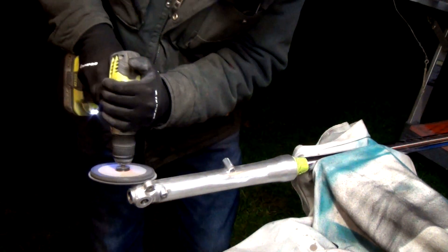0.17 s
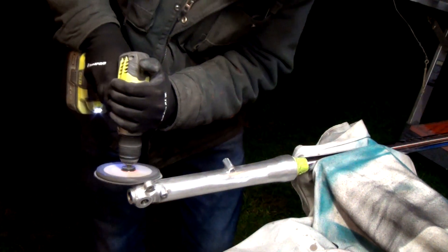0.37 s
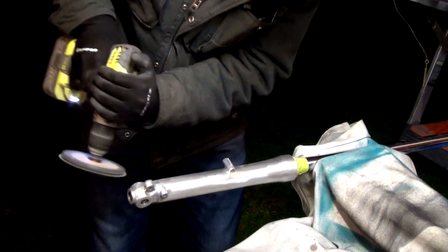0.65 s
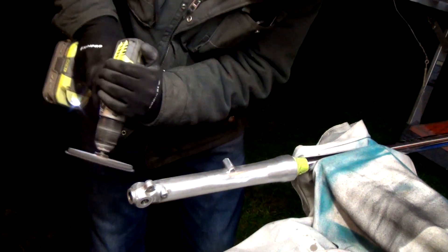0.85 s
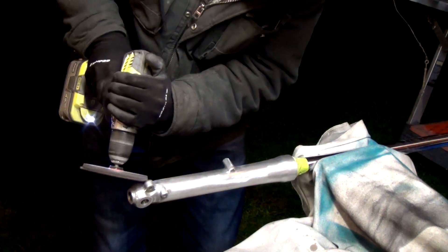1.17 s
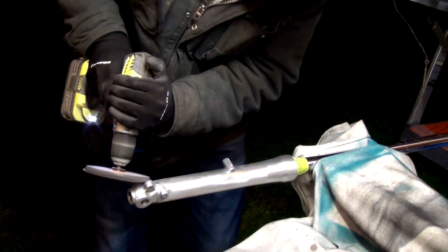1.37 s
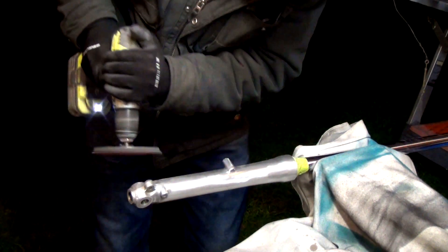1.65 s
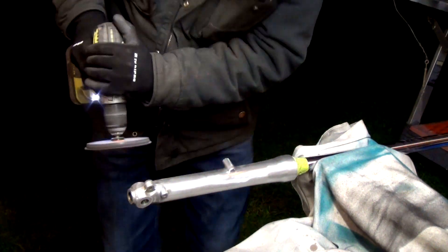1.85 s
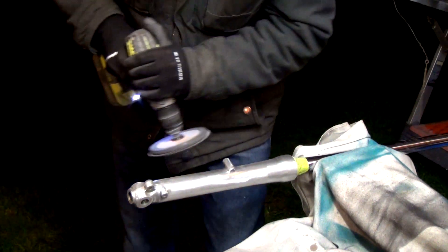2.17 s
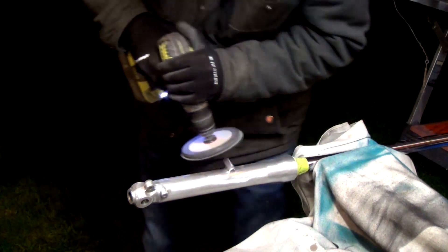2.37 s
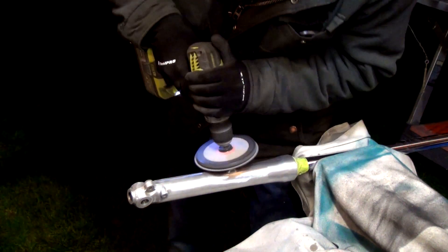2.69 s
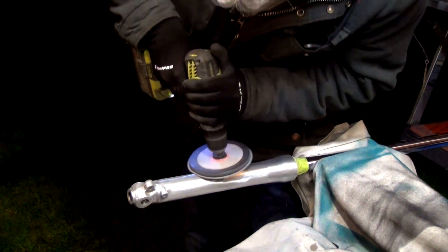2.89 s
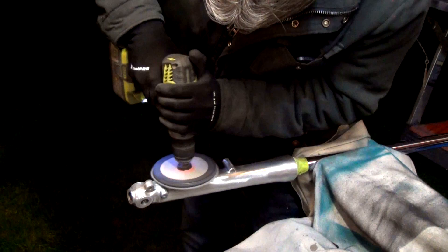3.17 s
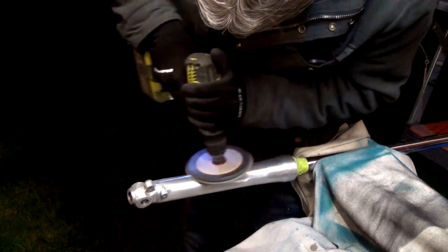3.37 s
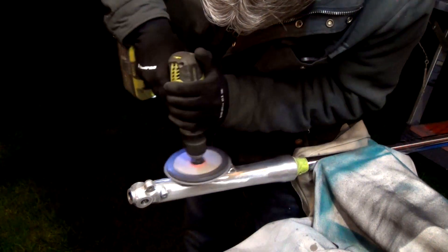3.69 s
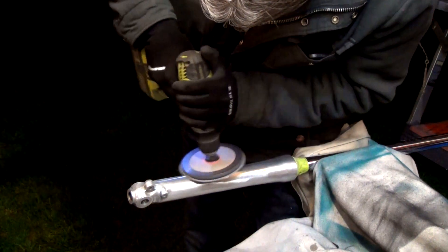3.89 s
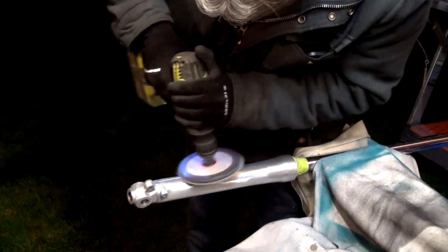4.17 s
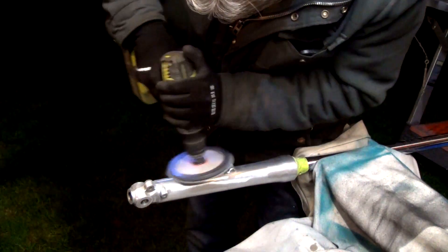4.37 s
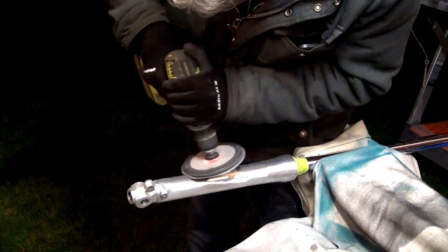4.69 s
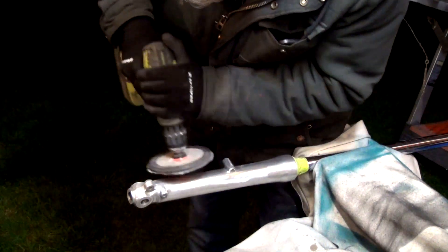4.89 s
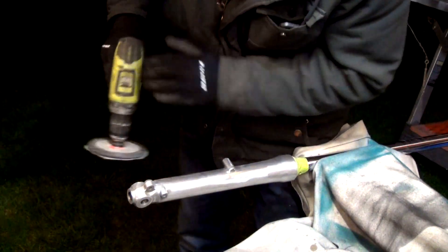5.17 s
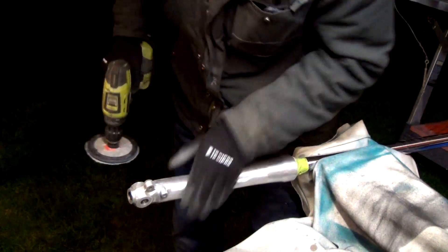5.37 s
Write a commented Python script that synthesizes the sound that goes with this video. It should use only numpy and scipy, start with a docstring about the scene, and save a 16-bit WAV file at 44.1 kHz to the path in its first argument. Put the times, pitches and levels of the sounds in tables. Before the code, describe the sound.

A cordless drill is already running close by outdoors, a steady shrill whine around 3.5 kHz with thinner overtones, gear clatter and airy fan hiss. At 0.2-0.7 s its sanding disc touches an aluminium tube: a bright gritty rasp with hollow ring, pitch sagging, and a brief squeal near 0.4 s. A second, shorter touch comes at 1.25-1.55 s. The drill then runs free, its whine swelling and fading as it moves, with faint low thuds at 1.9 and 2.35 s. From 2.9 s a longer sanding pass rasps and booms; the motor bogs deeply around 3.5 s, recovers, and grinds on. About 4.4 s the trigger is released; whine and rasp slide down to a stop by 4.85 s. Tiny metallic ticks follow at 4.93-5 s, clothing rustles, a faint low hum passes, and at 5.45 s a glove lands softly and wipes along the tube over quiet hush and distant rumble.

```python
"""Drill with a sanding disc on a metal tube

A cordless drill in the open: its motor whines on multiples of the shaft speed over filtered noise for gears and fan.
The disc touches an aluminium tube: noise in grit, wall and boom bands rasps and booms as the shaft slows.
The trigger is let go, the spindle ticks to rest as decaying modes, and a glove wipes along the tube.
Rumble, hush and rustle lie beneath; squeal, hum and soft thuds are short sines."""
import sys
import numpy as np
from scipy import signal
from scipy.fft import rfft, irfft, next_fast_len
from scipy.io import wavfile
from scipy.ndimage import uniform_filter1d, map_coordinates

SR = 44100
rng = np.random.default_rng(int(sys.argv[2]) if len(sys.argv) > 2 else 0)


def transcribe(signal):
    """Save signal, clipped to [-1, 1], as a 16-bit WAV file at the path in sys.argv[1]."""
    frames = np.atleast_2d(signal).T
    limited = np.clip(frames, -1, 1)
    pcm = np.round(limited * 32767).astype(np.int16)
    wavfile.write(sys.argv[1], SR, pcm)


N = 244308

FREE_HZ = 293.4  # shaft speed running free
# what reaches the microphone as the housing turns, before load, slowing and wobble:
# [t/s, whine/dB, shaft hum/dB, high whine/dB, fan over gears/dB]
HOUSING_LEVELS = [(0, -27.5, -59, -39, 0), (.22, -34, -57.5, -43.5, -1.5), (.4, -36, -58, -45, 1),
                  (.47, -37, -59, -41, 3), (.505, -48, -59, -45, 2), (.54, -38, -62, -37, 1),
                  (.72, -29, -53.5, -41, 0), (1.12, -34.5, -56, -51, -0.5), (1.32, -33.5, -60, -47, 3.5),
                  (1.57, -32.5, -57, -42, 1), (1.7, -42.5, -54.5, -54, -0.5), (1.9, -31.5, -48, -56, -0.5),
                  (2.08, -32, -50, -59, -2), (2.26, -40, -48, -42, 0), (2.67, -27, -51.5, -44, 0.5),
                  (2.92, -27, -52.5, -41, 0), (3.26, -31.5, -56, -56, -3.5), (3.36, -34.5, -56, -52, -3),
                  (3.43, -26.5, -56, -50, -6), (3.505, -39, -60, -50, -9), (3.54, -31, -54, -51, -7),
                  (3.68, -30, -55.5, -50, 1), (3.9, -30, -54.5, -54, -4.5), (4.22, -38, -60, -54, -6),
                  (4.37, -31.5, -60, -50, 0), (4.43, -32, -54, -50, -2)]


def amp(db):
    """Amplitude factor of a level in dB."""
    return 10 ** (np.asarray(db) / 20)


def unit(x):
    """x scaled to rms 1."""
    return x / np.sqrt(np.mean(x ** 2) + 1e-20)


def along(points, hz):
    """Interpolate (Hz, value) points on a log frequency axis."""
    f, v = np.transpose(points)
    return np.interp(np.log(hz + 1), np.log(f + 1), v)


def curves(rows):
    """One value per sample for each column after the time."""
    s, *cols = np.transpose(rows)
    return [np.interp(np.arange(N) / SR, s, c) for c in cols]


def window(t0_s, t1_s, fade_s):
    """1 between two times, with linear fades inside them."""
    t = np.arange(N) / SR
    return np.clip(np.minimum(t - t0_s, t1_s - t) / fade_s, 0, 1)


def wobble(rate_hz):
    """Random curve, straight between rate_hz knots a second."""
    knots = rng.standard_normal(int(N * rate_hz / SR) + 4)
    return map_coordinates(knots, [np.arange(N) * rate_hz / SR], order=1)


def filtered(x, response):
    """x times a complex response of frequency."""
    m = next_fast_len(N + 8192)
    return irfft(rfft(x, m) * response(np.fft.rfftfreq(m, 1 / SR)), m)[..., :N]


def resonances(modes):
    """Response of (Hz, width Hz, dB) modes summed with alternating sign."""
    def response(f):
        total = 0
        for k, (centre, width, db) in enumerate(modes):
            damping = 1j * f * width
            total = total + (-1) ** k * amp(db) * damping / (centre ** 2 - f ** 2 + damping)
        return total
    return response


def colour(points):
    """Response of a (Hz, dB) spectrum."""
    return lambda hz: amp(along(points, hz))


def noise(response, patchy_db, grainy_db=0.):
    """Noise of rms 1 with time-frequency patches of random gain and grains of uneven size."""
    grains = rng.standard_normal(N) * amp(grainy_db * wobble(2500))
    z = signal.stft(grains, nperseg=512)[2]
    field = uniform_filter1d(rng.standard_normal(z.shape), 6, 0)
    field = uniform_filter1d(field, 8, 1)
    patched = signal.istft(z * amp(patchy_db * unit(field)), nperseg=512)[1][:N]
    return unit(filtered(patched, response))


def shaft():
    """Shaft turns, halvings of speed below free running, and load (0-1) taken from the speed sag."""
    # shaft speed; after the last point it coasts evenly to a stop: [t/s, f/Hz]
    speed = [(0, 294), (.25, 293.8), (.39, 278.8), (.48, 276.7), (.54, 272), (.63, 290.5), (.72, 293),
             (1.3, 293.3), (1.42, 281.4), (1.5, 290), (1.62, 292.8), (2.96, 293.4), (3.06, 288.3),
             (3.27, 285.4), (3.4, 222.7), (3.5, 205.8), (3.58, 262.2), (3.67, 285.6), (3.8, 293),
             (3.97, 283.4), (4.22, 278.3), (4.3, 282.5), (4.375, 274.3), (4.43, 239.7), (4.53, 162)]
    stop_s = 4.825
    coast = np.clip((stop_s - np.arange(N) / SR) / (stop_s - speed[-1][0]), 1e-6, 1)
    hz = curves(speed)[0] * coast
    load = np.clip((FREE_HZ - hz) / 8, 0, 1)
    unsteady = 1 + (0.00059 + 0.002 * load + .004 * (1 - coast)) * wobble(80)
    return np.cumsum(hz * unsteady) / SR, np.log2(FREE_HZ / hz), load


def whine(turns, halvings, load):
    """Shaft-speed multiples swell as the housing turns; load adds flutter and weakens the upper ones."""
    # multiples with their own load loss and flutter, free running: [multiple/1, level/dB]
    middle_orders = [(3, -63), (5, -50.5), (20, -47)]
    # weak multiples, free running: [multiple/1, level/dB]
    weak_orders = [(2, -62), (4, -57), (10, -51), (14, -58), (15, -54), (17, -64), (18, -60), (21, -60),
                   (22, -54), (23, -59), (24, -54), (25, -49), (26, -52), (27, -51), (28, -56), (29, -55),
                   (30, -53), (32, -57), (33, -58), (34, -56), (35, -52), (36, -61), (37, -65), (38, -66),
                   (39, -64), (40, -58), (41, -67), (42, -67), (45, -67), (49, -64), (50, -62), (51, -64),
                   (52, -67)]
    whine_order, high_order = 12, 31
    case_hz, case_width_hz, case_db = 1010, 45, -34
    db_per_halving = 21

    def tone(order):
        return np.sqrt(2) * np.sin(2 * np.pi * (order * turns + rng.random()))

    def flutter_db():
        return (1.2 + 2.6 * load + 4 * np.minimum(halvings, 1)) * wobble(70)

    whine_db, hum_db, high_db, _ = curves(HOUSING_LEVELS)
    total = amp(whine_db + 1.23 * wobble(7.9) + flutter_db()) * tone(whine_order)
    total += amp(hum_db + flutter_db()) * tone(1)
    total += amp(high_db - 13 * load + 3 * wobble(9) + flutter_db()) * tone(high_order)
    for order, db in middle_orders:
        load_loss_db = 18 if order > whine_order else 6
        level_db = db - load * load_loss_db + 4.24 * wobble(9) + flutter_db()
        total += amp(level_db) * tone(round(order))
    # the casing rings when the fifth multiple sinks through its resonance
    fifth_hz = FREE_HZ * 5 / 2 ** halvings
    total += amp(case_db + flutter_db()) / (1 + ((fifth_hz - case_hz) / case_width_hz) ** 2) * tone(5)
    for order, db in weak_orders:
        total += amp(db - 20 * load + 4 * wobble(8)) * tone(order)
    return total * amp(-db_per_halving * halvings)


def rush(turns, halvings):
    """Gear clatter and fan hiss, falling as the shaft slows; the fan beats once and twice per turn."""
    # gear noise spectrum: [f/Hz, relative density/dB]
    gear_spectrum = [(35, -65), (60, -44), (236, -24.5), (289, -13.5), (427, -20), (513, -14.5), (653, -16),
                     (1370, -7), (1450, -6.5), (1680, -6), (2210, -3.5), (3270, -5.5), (3450, -7.5),
                     (3720, -5), (5000, -25.5), (6500, -50.5), (11000, -120)]
    # fan noise spectrum: [f/Hz, relative density/dB]
    fan_spectrum = [(2650, -23), (4500, -3.5), (5040, -11), (5590, -4.5), (5680, -0.5), (6740, -1),
                    (7400, 2), (8130, -2), (10100, -3), (12600, -14), (15500, -13.5)]
    gears_db, db_per_halving = -37, 4.5
    beat = 1 + 0.052 * np.cos(2 * np.pi * turns) + 0.059 * np.cos(4 * np.pi * turns)
    gears = noise(colour(gear_spectrum), patchy_db=1.0)
    fan = noise(colour(fan_spectrum), patchy_db=1.0, grainy_db=1.0)
    fan = amp(curves(HOUSING_LEVELS)[3]) * beat * fan
    return amp(gears_db - db_per_halving * halvings + 0.62 * wobble(7)) * (gears + fan)


def air():
    """Distant rumble, the hush of the surroundings and clothes that stir more once the work is done."""
    # distant rumble spectrum: [f/Hz, relative density/dB]
    rumble_spectrum = [(12, -40), (30, -14), (48, -1), (70, -3), (110, -6), (200, -44)]
    # hush spectrum: [f/Hz, relative density/dB]
    hush_spectrum = [(12, -49), (20, -34), (161, -9.5), (189, -6), (324, -12), (404, -8), (437, -14),
                     (602, -15), (640, -15.5), (1370, -17), (2400, -31), (3120, -49), (5280, -120)]
    # rustle spectrum: [f/Hz, relative density/dB]
    rustle_spectrum = [(1060, -23), (1800, -3), (2400, -5), (2780, -6), (3210, -5), (3980, -7), (4990, -15),
                       (5920, -9.5), (9050, -11), (15500, -22)]
    rumble_db, hush_db, rustle_db, rustle_s = -77.5, -62, -66, 4.95
    rumble = noise(colour(rumble_spectrum), patchy_db=0.0)
    hush = noise(colour(hush_spectrum), patchy_db=1.2)
    stir_db = -5.5 + 5.6 * window(rustle_s - .04, 9, .05)
    stir_db += 4 * window(rustle_s - .02, rustle_s + .06, .02) + 1.2 * wobble(12)
    rustle = amp(stir_db) * noise(colour(rustle_spectrum), patchy_db=1.8, grainy_db=1.0)
    return amp(rumble_db) * rumble + amp(hush_db) * hush + amp(rustle_db) * rustle


def contact_noises(turns):
    """Grit, fine grit, tube wall and boom noises; the warped disc bears unevenly once and twice a turn."""
    # grit spectrum: [f/Hz, relative density/dB]
    grit_spectrum = [(3800, -23.5), (5000, -1), (5700, 0.5), (6700, -0.5), (8900, 1.5), (9400, -0.5),
                     (10000, -8), (11000, -16.5), (14300, -33), (22000, -120)]
    # fine grit spectrum: [f/Hz, relative density/dB]
    fine_spectrum = [(6470, -35), (11000, -1), (13300, -2.5), (14700, -3), (15500, -5)]
    # tube wall modes: [f/Hz, width/Hz, relative level/dB]
    wall_modes = [(513, 14, -5.5), (1008, 34, -1), (1170, 64, -5.5), (1420, 146, 0), (1894, 260, -0.5),
                  (2210, 230, 0), (2684, 210, 3), (3106, 180, 5.5), (3310, 780, 2), (4440, 610, 0.5)]
    # tube on its rest, response before squaring: [f/Hz, width/Hz, relative level/dB]
    boom_modes = [(126, 62, -8), (169, 34, 1.5), (198.7, 38, 0)]
    disc = turns / 14.5  # gear reduction
    bearing_db = 0.69 * np.cos(4 * np.pi * disc) + 0.57 * np.cos(2 * np.pi * disc)
    bearing = amp(bearing_db + 0.19 * wobble(40))
    grit = bearing * noise(colour(grit_spectrum), patchy_db=2.0, grainy_db=1.5)
    fine = noise(colour(fine_spectrum), patchy_db=2.0, grainy_db=1.5)
    fine = bearing * amp(1.5 * wobble(14)) * fine
    wall = bearing * noise(resonances(wall_modes), patchy_db=1.0, grainy_db=3.0)
    boom = noise(lambda f: resonances(boom_modes)(f) ** 2, patchy_db=1.)
    return grit, fine, wall, boom


def sanding(contact, halvings):
    """Disc pressure drives grit, wall ring and tube boom; a slower disc rings the wall less."""
    # pressure of the disc, one list per touch: [t/s, grit/dB, boom/dB]
    touches = [
        [(.2, -45, -75), (.29, -33, -52), (.37, -32.5, -61), (.42, -32, -50), (.56, -31.5, -56),
         (.62, -39.5, -53), (.7, -47, -70)],
        [(1.2, -52, -75), (1.28, -37.5, -65), (1.36, -31, -51), (1.43, -32, -56), (1.5, -36.5, -51),
         (1.546, -35, -54), (1.57, -56, -57), (1.7, -59, -68)],
        [(2.9, -41, -72), (3.01, -34.5, -63), (3.14, -34, -61), (3.3, -33, -58), (3.38, -36.5, -57),
         (3.5, -36.5, -58), (3.55, -33.5, -54), (3.73, -37, -56), (3.81, -40, -78), (3.86, -34, -52.5),
         (4.06, -33.5, -53.5), (4.37, -33, -52), (4.55, -39.5, -60), (4.72, -54.5, -57), (4.79, -52, -60),
         (4.865, -56, -66), (4.885, -68, -82)],
    ]
    # balance of each touch at full pressure: [fine grit over grit/dB, wall ring over grit/dB]
    tints = [(-10, -1), (-7, -2.5), (-9.5, -0.5)]
    full_db, fine_follows, wall_follows = -34, 0.56, 1.05  # follows: dB per dB of grit
    wall_db_per_halving = 2.2
    grit, fine, wall, boom = contact
    out = np.zeros(N)
    for rows, (fine_db, wall_db) in zip(touches, tints):
        grit_db, boom_db = curves(rows)
        swing_db = grit_db - full_db
        slowing_db = wall_db_per_halving * np.minimum(halvings, 4)
        rasp = amp(swing_db) * grit
        rasp += amp(fine_db + fine_follows * swing_db) * fine
        rasp += amp(wall_db + wall_follows * swing_db - slowing_db) * wall
        gate = window(rows[0][0], rows[-1][0] + 0.025, 0.024)
        out += gate * (amp(full_db) * rasp + amp(boom_db) * boom)
    return out


def glove_wipe(contact):
    """The glove lands with a decaying scuff of the wall, then slides on with grit and boom noise."""
    wipe_s, scuff_db, scuff_t60_s = 5.447, -52.5, 0.17
    slide_db, boom_db = -58, -56.5
    grit, fine, wall, boom = contact
    since_s = np.maximum(np.arange(N) / SR - wipe_s - .012, 0)
    scuff = window(wipe_s, 9, 0.0056) * amp(scuff_db - 60 * since_s / scuff_t60_s) * wall
    slide = amp(slide_db) * grit + amp(slide_db - 3) * fine + amp(boom_db) * boom
    return scuff + window(wipe_s + 0.0046, 9, 0.018) * slide


def brief_tones():
    """Gliding sines with random level: a squeal of the tube and a low hum."""
    # squeal, hum: [t/s, length/s, from f/Hz, to f/Hz, rms level/dB]
    tones = [(.41, 0.093, 3150, 3090, -36), (5.04, .085, 222, 248, -61)]
    out = np.zeros(N)
    for s, length_s, from_hz, to_hz, db in tones:
        hz, = curves([(s, from_hz), (s + length_s, to_hz)])
        sine = np.sqrt(2) * np.sin(2 * np.pi * np.cumsum(hz) / SR)
        out += amp(db + 1.2 * wobble(49)) * sine * window(s, s + length_s, 0.031)
    return out


def soft_thuds():
    """Low sines with a soft onset and exponential decay."""
    # thuds, level before the onset curve: [t/s, level/dB, f/Hz]
    thuds = [(1.919, -53, 109.3), (2.349, -44, 110.1), (5.477, -40, 163)]
    out, t = np.zeros(N + SR), np.arange(SR // 8) / SR
    for s, db, hz in thuds:
        thud = amp(db - 60 * t / 0.077) * np.sin(2 * np.pi * hz * t)
        out[round(s * SR):][:len(t)] += thud * (1 - np.exp(-t / .003))
    return out[:N]


def spindle_ticks():
    """The spindle ticks to rest: decaying chuck modes plus a short noise snap."""
    # ticks: [t/s, relative level/dB]
    ticks = [(4.9325, -49.5), (4.9525, -58), (4.977, -56), (4.9955, -56)]
    # chuck modes, level varies from tick to tick: [f/Hz, relative level/dB, t60/s]
    chuck_modes = [(2300, -3, .012), (3020, -1, 0.014), (3900, -3, .012), (4600, -2, 0.011),
                   (6400, -10, .012), (7600, -7, .008), (9300, -15, .006)]
    out, t = np.zeros(N + SR), np.arange(SR // 8) / SR
    for s, db in ticks:
        ring = np.zeros(len(t))
        for hz, level_db, t60_s in chuck_modes:
            ring += amp(level_db + rng.normal(0, 2.5) - 60 * t / t60_s) * np.sin(2 * np.pi * hz * t)
        snap = np.convolve(rng.standard_normal(len(t)), [1, 2, 2, 1, -1, -2, -2, -1], "same")
        snap *= amp(-60 * t / .012)
        out[round(s * SR):][:len(t)] += amp(db) * (.22 * ring + .15 * snap)
    return out[:N]


def scene():
    """Tones and small sounds in mid; noises drawn separately for mid and side spread the image."""
    # side level of the noises: [f/Hz, gain/dB]
    scatter = [(40, -22), (150, -20), (400, -15.5), (650, -15), (1500, -18), (2300, -19.5), (2900, -70),
               (5200, -62), (5800, -11.5), (9000, -17), (10500, -43), (15000, -39)]
    turns, halvings, load = shaft()

    def noises():
        contact = contact_noises(turns)
        return rush(turns, halvings) + air() + sanding(contact, halvings) + glove_wipe(contact)

    tones = whine(turns, halvings, load)
    # the whine leans left and sways a little as the tool moves
    sway = 0.027 + 0.084 * wobble(3.1)
    side = filtered(noises(), colour(scatter)) + sway * tones
    mid = tones + noises() + brief_tones() + soft_thuds() + spindle_ticks()
    return np.array([mid + side, mid - side])


def record(dry):
    """The two ports lean left or right with frequency; nothing passes above the band limit."""
    # port balance: [f/Hz, left minus right/dB]
    lean = [(60, .5), (110, -.5), (200, -1.5), (380, -1.5), (700, 3), (1290, 2.5), (2400, .2), (5500, .3),
            (8000, .6), (15000, .1)]
    top_hz = 15700
    return filtered(dry, lambda hz: amp(np.outer([.5, -.5], along(lean, hz))) * (hz < top_hz))


dry = scene()
out = record(dry)
transcribe(out)
```